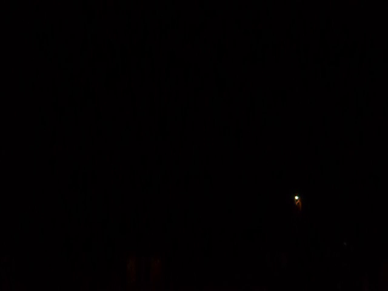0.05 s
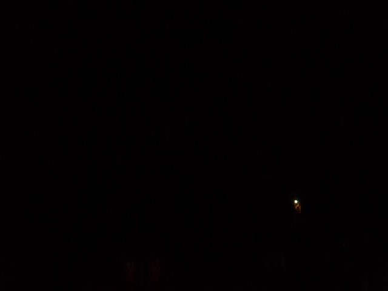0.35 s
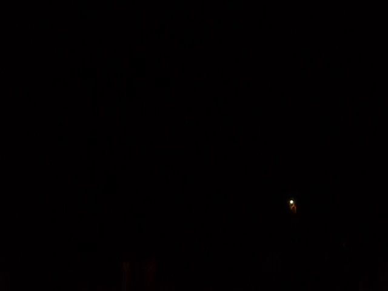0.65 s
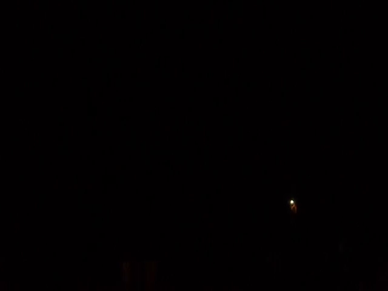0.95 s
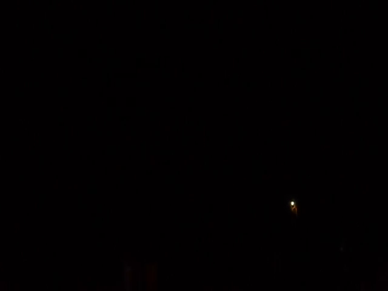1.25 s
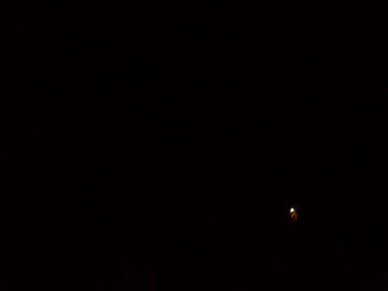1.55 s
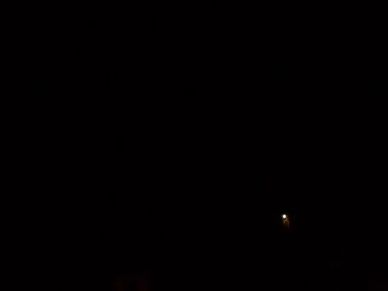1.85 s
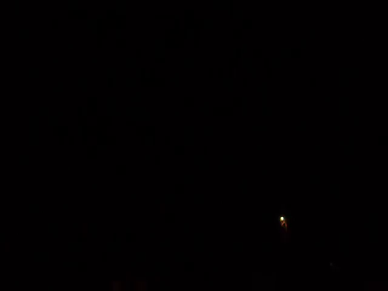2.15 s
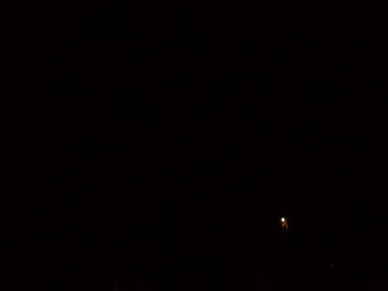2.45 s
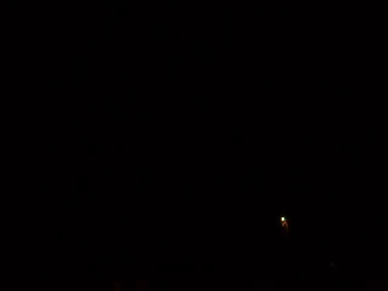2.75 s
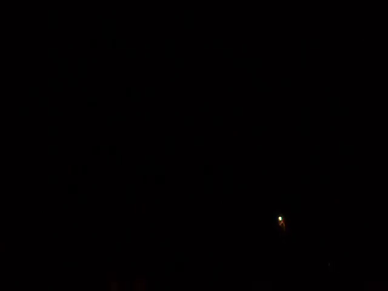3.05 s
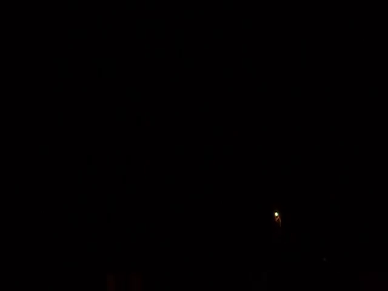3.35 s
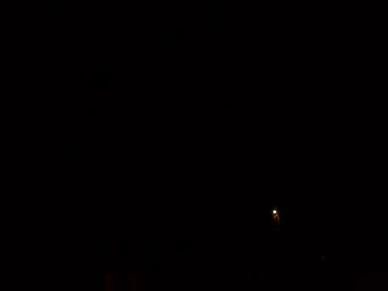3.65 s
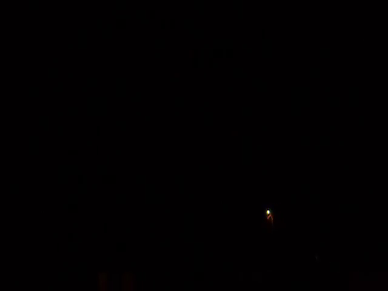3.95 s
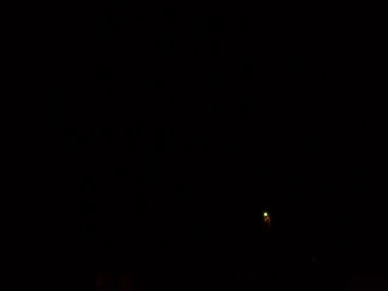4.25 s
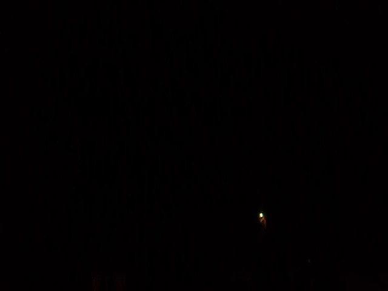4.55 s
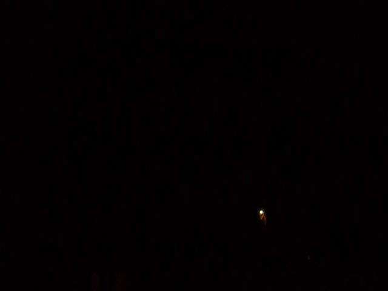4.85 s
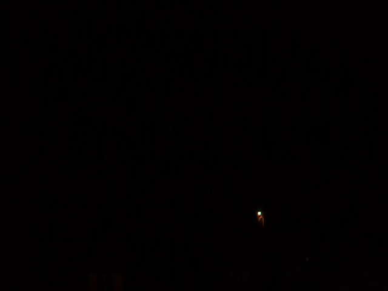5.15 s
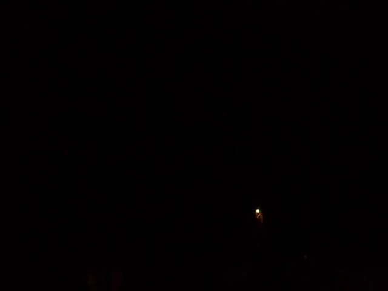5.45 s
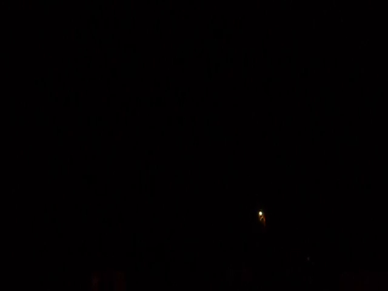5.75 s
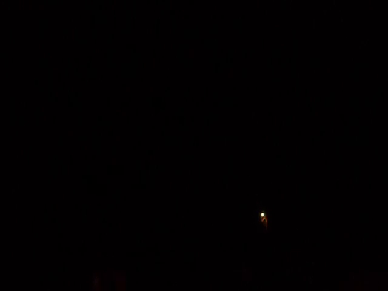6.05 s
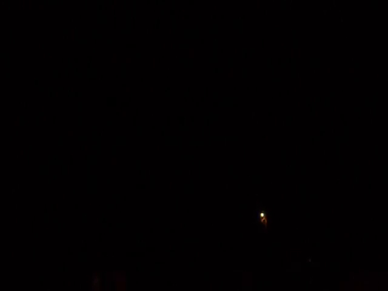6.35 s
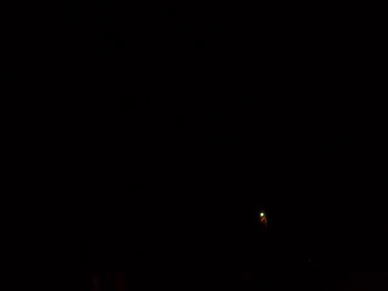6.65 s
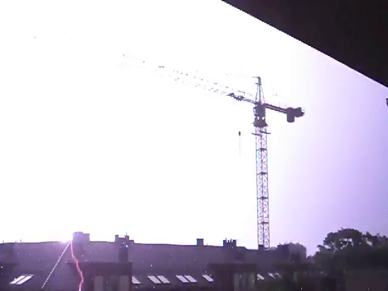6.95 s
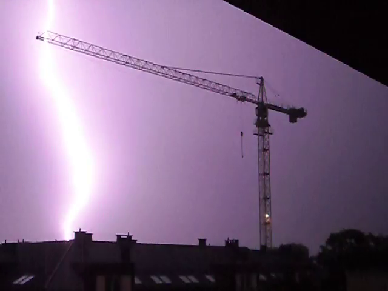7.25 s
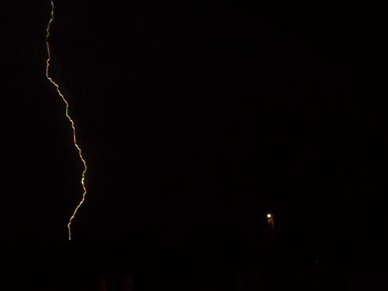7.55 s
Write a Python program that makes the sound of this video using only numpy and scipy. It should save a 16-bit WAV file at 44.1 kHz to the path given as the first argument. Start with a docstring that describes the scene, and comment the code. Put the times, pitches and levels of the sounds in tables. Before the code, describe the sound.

Distant thunder rolls throughout over steady rain on town roofs, heard from under the eaves. The deep rumble builds in the first two seconds, with heavy thumps, then surges again around the middle and carries on, a little duller. Close by, raindrops patter, fat drips splatter on a sheet-metal ledge, and small plops sound in puddles.

```python
"""Thunder rolls over the roofs of a town at night, heard from under the eaves in steady rain.
Shock waves from along a far lightning channel travel unequal paths, so they arrive spread out in time,
as peals and bumps over a rumble of echoes. Raindrop impacts merge into a wash on the roofs and patter
close by. Bubbles ring in puddles, and fat drips from the eaves burst into spray on a sheet-metal ledge."""
import sys
import numpy as np
from scipy import signal
from scipy.fft import rfft, irfft
from scipy.io import wavfile
from scipy.ndimage import uniform_filter1d

SR = 44100
rng = np.random.default_rng(int(sys.argv[2]) if len(sys.argv) > 2 else 0)


def dump(signal):
    """Clip the signal to [-1, 1] and save it as 16-bit WAV at the path in sys.argv[1]."""
    limited = np.clip(np.atleast_2d(signal).T, -1, 1)
    pcm = np.round(limited * 32767).astype(np.int16)
    wavfile.write(sys.argv[1], SR, pcm)


N = 344421
TIME = np.arange(N) / SR

# Spectra of the far wash and the near patter of rain. Each row: frequency in Hz, gain in dB.
WASH_SPECTRUM = [(100, 9), (300, -6.5), (600, 1.5), (950, -0.5), (1300, -1), (1900, -2.5), (2700, -8),
                 (4000, -11), (4800, -12), (7000, -18.5), (10000, -23.5), (12000, -37.5)]
PATTER_SPECTRUM = [(400, 0.5), (900, -8), (1270, 7.5), (1550, -8), (1900, 4), (2400, -0.5), (2700, -4),
                   (3050, -6), (3900, -7.5), (4750, -16), (5400, -12), (6200, -9.5), (8000, -19.5),
                   (10500, -19)]
# Modes of the ledge. Each row: frequency in Hz, relative level in dB, seconds to decay by 60 dB.
LEDGE_MODES = [(3150, -2, 0.05), (4597, 0.5, 0.041), (4908, 2.5, 0.029), (5270, -13, 0.033),
               (5900, -5.5, 0.035), (6730, -7.5, 0.034), (9300, -11.5, .025)]
# Drops falling into standing water. Each row: start in seconds, peak in dB, starting pitch in Hz.
PUDDLE_PLOPS = [(0.275, -32, 2980), (0.618, -32, 1830), (2.375, -31, 2390), (2.549, -34, 1490),
                (3.139, -31, 2300), (3.882, -29, 2020), (4.088, -29, 1950), (4.333, -28.5, 1520),
                (6.503, -29, 1950), (6.896, -30, 1650)]
# Fat drips from the eaves. Each row: start in seconds, base level in dB, splat emphasis in dB.
FAT_DRIPS = [(0.2694, -35, 10.5), (0.37, -40.5, 14), (0.715, -41, 14), (2.0057, -35, 12), (2.127, -34, 12),
             (2.3986, -32.5, 11), (2.748, -28, 1.5), (2.8458, -31.5, 9), (3.139, -36, 8), (3.2224, -32, 7),
             (3.289, -37, 5), (3.5383, -36, 7), (3.68, -35.5, 8.5), (3.9763, -30, 3), (4.085, -35.5, 8),
             (4.1327, -30.5, 5.5), (4.1544, -31, -3), (4.4741, -35, 7), (4.5237, -31.5, 6),
             (4.7643, -29.5, 8), (5.4549, -32.5, 2), (5.5367, -34.5, 7), (5.6161, -32.5, 5),
             (5.9937, -27.5, 1), (6.308, -31, -1), (6.4177, -34, 3), (6.8757, -35, 4), (7.2572, -33.5, 3),
             (7.5188, -28, -1), (7.536, -31, 2)]
# Spectra of a drip's spray and of its splat. Each row: frequency in Hz, gain in dB.
SPRAY_SPECTRUM = [(2000, -25), (3000, -3), (3900, -8), (4700, -4), (5400, 1), (7500, -7.5), (10000, -11.5),
                  (12000, -18)]
SPLAT_SPECTRUM = [(300, -24.5), (700, -1), (1250, 2), (1900, 1), (2500, -3.5), (3500, -22)]
# Air resonances under the eaves. Each row: frequency in Hz, bandwidth in Hz, gain in dB.
RECESS_MODES = [(121.4, 7.8, 6), (144.5, 8.5, 3.5), (188, 10.7, 0), (198, 13, 0)]
# Spectra of the thunder's boom and body, and of its growl. Each row: frequency in Hz, gain in dB.
THUNDER_SPECTRUM = [(13, 0.5), (30, 5), (46, 6), (64, -3.5), (82, 3), (98, -1.5), (108, -8), (160, -1.5),
                    (200, -4), (225, -6), (255, -4), (280, -11.5), (400, -14)]
GROWL_SPECTRUM = [(200, -18), (300, 2), (420, 2.5), (520, 0.5), (680, -2), (820, -8), (1150, -13.5),
                  (1800, -24.5)]
# Merged echoes beneath the peals. Each row: time in seconds, level in dB.
RUMBLE_LEVELS = [(0.0, -39), (0.55, -31.5), (2.4, -25.5), (3.6, -30.5), (5.2, -29.5), (6.5, -33.5),
                 (7.81, -34.5)]
# Peals, one from each stretch of the lightning channel.
# Each row: start in seconds, length in seconds, levels of the boom, body and growl in dB.
THUNDER_PEALS = [(-0.03, .12, -27, -33, -40.5), (0.266, .09, -41, -30.5, -40),
                 (0.64, 0.084, -38, -27.5, -44.5), (0.782, 0.083, -24, -35, -33),
                 (1.087, 0.058, -21, -22.5, -37), (1.197, 0.1, -34, -29, -37.5),
                 (1.354, .08, -28, -26, -37), (1.59, 0.075, -28, -24.5, -57),
                 (1.695, 0.12, -20.5, -39, -32), (1.878, 0.22, -19.5, -25.5, -30),
                 (2.36, 0.38, -34, -25, -33), (2.79, 0.12, -23, -31, -40), (2.972, 0.48, -30, -29.5, -41),
                 (3.699, .11, -27, -24, -34), (4.03, 0.072, -40, -26, -44), (4.17, 0.087, -28, -25, -36.5),
                 (4.352, 0.17, -27, -23, -35), (4.528, 0.26, -31, -25.5, -37.5),
                 (4.845, 0.16, -22.5, -25.5, -38.5), (5.055, 0.082, -25, -26.5, -38),
                 (5.162, .23, -21.5, -30, -59), (5.582, 0.063, -26.5, -30, -52),
                 (5.78, 0.085, -23, -24, -34), (5.987, 0.11, -26.5, -31.5, -48),
                 (6.153, 0.17, -25, -31, -48), (6.582, 0.075, -20, -27, -39), (6.807, 0.093, -26, -41, -45),
                 (7.01, 0.16, -24.5, -36, -58), (7.642, 0.13, -28, -30.5, -55)]
# Single strong shock fronts. Each row: start in seconds, peak in dB, pitch in Hz.
SHOCK_FRONTS = [(1.118, -25, 195), (1.37, -10, 182), (1.418, -19, 194), (1.856, -11.5, 162),
                (2.545, -15, 172), (2.664, -15, 205), (4.399, -13, 189), (4.464, -10.5, 151),
                (4.869, -15, 126), (5.116, -21, 134), (5.803, -17, 173), (6.598, -13.5, 146),
                (6.635, -16.5, 149)]
# The highs fall away above 10 kHz to a faint shelf. Each row: frequency in Hz, gain in dB.
TREBLE_ROLLOFF = [(10, -3.5), (9500, -0.5), (10100, -1), (10500, -5), (11000, -13.5), (12000, -12.5)]


def undb(db):
    """Amplitude grows tenfold with every 20 dB."""
    return 10 ** (np.asarray(db) / 20)


def unit(x):
    """Normalisation to rms 1."""
    return x / np.sqrt(np.mean(x ** 2) + 1e-20)


def steady(x, seconds):
    """Division by the running rms holds the level near 1."""
    return x / np.sqrt(uniform_filter1d(x ** 2, int(seconds * SR)) + 1e-9 * np.mean(x ** 2))


def colour(x, spectrum, size=16384):
    """A minimum-phase filter imposes the spectrum, falling 20 dB an octave beyond its ends."""
    hz, db = np.transpose(spectrum)
    grid = np.maximum(np.arange(size // 2 + 1) * SR / size, 1)
    octaves_beyond = np.abs(np.log2(grid / np.clip(grid, hz[0], hz[-1])))
    gain = undb(np.interp(np.log(grid), np.log(hz), db) - 20 * octaves_beyond)
    cepstrum = irfft(np.log(gain))
    cepstrum[1:size // 2] *= 2  # folding the cepstrum makes the filter causal
    cepstrum[size // 2 + 1:] = 0
    return signal.fftconvolve(x, irfft(np.exp(rfft(cepstrum))))[:len(x)]


def band(x, lo_hz, hi_hz, order=4):
    """A band-pass filter attenuates what lies outside its two edges."""
    return signal.sosfilt(signal.butter(order, [lo_hz, hi_hz], "band", fs=SR, output="sos"), x)


def impacts(rate, spread_db):
    """Shot noise: independent impulses of random sign and size, on average rate a second."""
    chance, sign = rng.random(N), rng.choice([-1, 1], N)
    size = np.minimum(rng.exponential(size=N), 4.5)
    return (chance < rate / SR) * sign * undb(spread_db * size)


def wander(rate):
    """Linear interpolation of random values, rate a second, gives a slow fluctuation of rms 1."""
    return unit(np.interp(TIME * rate, np.arange(1000), rng.standard_normal(1000)))


def add(out, start_s, x):
    """Superposition: x adds to the sound already in out."""
    start = max(int(start_s * SR), 0)
    out[start:start + len(x)] += x[:N - start]


def echo_paths(t, rate, decay_s, db=0):
    """Multipath response: a direct impulse, then sparse reflections that weaken with delay."""
    arrivals = rng.random(len(t)) < rate / SR
    paths = arrivals * rng.standard_normal(len(t)) * np.exp(-t / decay_s) * undb(db)
    paths[0] = 1
    return paths


def reverberate(x, t60, wet_db):
    """Diffuse reflections follow the direct sound and decay exponentially."""
    tail = rng.standard_normal(SR) * np.exp(-np.log(1000) * TIME[:SR] / t60)
    return x + undb(wet_db) * signal.fftconvolve(x, tail / np.linalg.norm(tail))[:N]


def ledge(strikes, spread_db=4.5):
    """Struck sheet metal rings in damped modes, whose balance depends on the spot that is struck."""
    t = TIME[:SR // 5]
    spot_db = spread_db * rng.standard_normal(len(LEDGE_MODES))
    ring = sum(undb(db + spot) * np.sin(2 * np.pi * hz * t) * np.exp(-np.log(1000) * t / t60)
               for (hz, db, t60), spot in zip(LEDGE_MODES, spot_db))
    return signal.fftconvolve(strikes, ring / np.linalg.norm(ring))[:len(strikes)]


def rain(base_db=-40, flutter_db=0.83, wash_db=2, patter_db=-6, tick_db=-7, ring_db=-17, splash_s=0.0061):
    """Far impacts sum incoherently to a wash; near drops tick and splash, and some ping on the ledge."""
    gain = undb(base_db + flutter_db * wander(rate=12))
    wash = unit(colour(impacts(rate=9000, spread_db=1.5), WASH_SPECTRUM))
    drops = impacts(rate=210, spread_db=3)
    # each drop's energy dies away exponentially
    splash_power = signal.lfilter([1], [1, -np.exp(-1 / (splash_s * SR))], drops ** 2)
    splashes = np.sqrt(splash_power) * impacts(rate=7000, spread_db=-0.5)
    patter = unit(colour(unit(splashes) + undb(tick_db) * unit(drops), PATTER_SPECTRUM))
    pings = unit(ledge(impacts(rate=55, spread_db=-2)))
    return gain * (undb(wash_db) * wash + undb(patter_db) * patter + undb(ring_db) * pings)


def plop(hz, decay_cycles=9, glide=0.059):
    """A trapped bubble is a damped oscillator of rising pitch; wall and eaves reflect it. Peak 1."""
    t = TIME[:SR // 12]
    age = t * hz / decay_cycles
    pitch_hz = hz * (1 + glide * np.minimum(age, 2))
    bubble = np.sin(2 * np.pi * np.cumsum(pitch_hz) / SR) * np.exp(-age)
    sound = signal.fftconvolve(echo_paths(t, rate=600, decay_s=0.014), bubble)[:len(t)]
    return sound / np.abs(sound).max()


def puddles(small_db=-41, spread_db=1.5, centre_hz=1800, octaves=0.36, count=400):
    """Bubble resonance in standing water gives a few clear plops among many small ones."""
    out = np.zeros(N)
    starts = rng.random(count) * TIME[-1]
    deviations = np.clip(rng.standard_normal((count, 2)), -2, 2)
    for start, db, hz in PUDDLE_PLOPS:
        add(out, start, plop(hz) * undb(db))
    for start, (pitch, size) in zip(starts, deviations):
        add(out, start, plop(centre_hz * 2 ** (octaves * pitch)) * undb(small_db + spread_db * size))
    return out


def small_drips(count=24, db=-41, spread_db=2.5, emphasis_db=9):
    """Lesser drips are uniformly distributed in time and level; their rows are like the fat ones'."""
    return [(when * TIME[-1], db + spread_db * (2 * size - 1), emphasis_db)
            for when, size in rng.random((count, 2))]


def drips(spray_db=-11, splat_db=-9, ring_db=-8, hard_db=-24, splat_s=0.048, snap_s=0.0036):
    """Impact breaks a drip into droplets: a low splat, and a bright spray that excites the ledge."""
    out = np.zeros(N)
    t = TIME[:SR // 5]
    for start, db, emphasis_db in FAT_DRIPS + small_drips():
        droplets = rng.standard_normal(len(t)) * (rng.random(len(t)) < 10000 / SR)
        spray_s = 0.02 * np.exp(0.06 * emphasis_db)  # wetter splats spray for longer
        snap = undb(db - hard_db) ** 2 * np.exp(-t / snap_s) / 2  # harder landings snap more
        spray_envelope = (np.exp(-t / spray_s) + snap) * undb(db + spray_db)
        splat_envelope = np.exp(-t / splat_s) * undb(db + emphasis_db + splat_db)
        spray = unit(colour(droplets, SPRAY_SPECTRUM, size=1024)) * spray_envelope
        splat = unit(colour(droplets, SPLAT_SPECTRUM, size=1024)) * splat_envelope
        add(out, start, spray + splat + undb(ring_db) * ledge(spray))
    return reverberate(out, t60=0.4, wet_db=-18)


def recess(x):
    """The air between wall, floor and eaves resonates at a few low frequencies."""
    return x + sum(undb(db) * signal.lfilter(*signal.iirpeak(hz, hz / width, fs=SR), x)
                   for hz, width, db in RECESS_MODES)


def air_absorption(x, split_hz, tilt_db_per_s=1.06, neutral_s=3.4):
    """Later sound has crossed more air, which absorbs the highs, so the spectrum tilts toward the bass."""
    lower = signal.sosfiltfilt(signal.butter(4, split_hz, fs=SR, output="sos"), x)
    tilt = undb(tilt_db_per_s * (TIME - neutral_s) / 2)
    return lower * tilt + (x - lower) / tilt


def peal(start, length, attack_s=0.027, release_s=0.056):
    """A peal's envelope rises, holds while sound from its stretch of the channel arrives, and decays."""
    age = TIME - start
    return np.clip(age / attack_s, 0, 1) * np.exp(-np.maximum(age - length, 0) / release_s)


def thunder_envelopes(clump_db=1.5):
    """Incoherent peals and rumble add in power; the level wavers as the shocks come in clumps."""
    rumble = undb(np.interp(TIME, *np.transpose(RUMBLE_LEVELS)))
    powers = np.outer(undb([0, 0, -9.5]), rumble) ** 2  # boom, body, growl
    for start, length, *levels_db in THUNDER_PEALS:
        powers += np.outer(undb(levels_db) ** 2, peal(start, length) ** 2)
    return [np.sqrt(power) * undb(clump_db * wander(rate=14)) for power in powers]


def thunder_bumps():
    """A strong shock is an N-shaped wave, dulled by distance and reflected by the house fronts."""
    out = np.zeros(N)
    t = TIME[:SR // 4]
    for start, db, hz in SHOCK_FRONTS:
        n_wave = np.interp(t[:SR // 20] * hz, [0, 1], [1, -1], right=0)
        paths = echo_paths(t, rate=260, decay_s=0.027, db=-8)
        echoed = signal.fftconvolve(paths, n_wave)[:len(t)]
        front = band(echoed, hz / np.sqrt(2), hz * np.sqrt(2), order=3)
        add(out, start, front / np.abs(front).max() * undb(db))
    return out


def thunder_roll():
    """Shocks from the channel's kinks superpose: far ones arrive as a boom, nearer ones keep a growl."""
    boom_gain, body_gain, growl_gain = thunder_envelopes()
    shocks = colour(impacts(rate=1600, spread_db=1.5), THUNDER_SPECTRUM)
    cracks = colour(impacts(rate=1500, spread_db=2), GROWL_SPECTRUM)
    boom = band(shocks, 11, 86)
    body = air_absorption(recess(band(shocks, 102, 323)), split_hz=150)
    growl = air_absorption(cracks, split_hz=400)
    return (steady(boom, seconds=0.08) * boom_gain
            + steady(body, seconds=0.083) * body_gain
            + steady(growl, seconds=0.07) * growl_gain)


def scene():
    """The pressures of far thunder and of nearer rain, drips and puddles add in one channel."""
    return (thunder_roll() + thunder_bumps() + rain() + drips() + puddles())[None]


def record(dry, whine_hz=7150, whine_db=-67.5, cutoff_hz=11900):
    """Low-pass filtering: the highs fall above 10 kHz to a steep cut near 12 kHz. A faint whine is added."""
    whine = np.sqrt(2) * undb(whine_db) * np.sin(2 * np.pi * whine_hz * TIME)
    low_pass = signal.ellip(10, 0.2, 80, cutoff_hz, fs=SR, output="sos")
    return signal.sosfilt(low_pass, colour(dry[0], TREBLE_ROLLOFF) + whine)[None]


dry = scene()
out = record(dry)
dump(out)
```